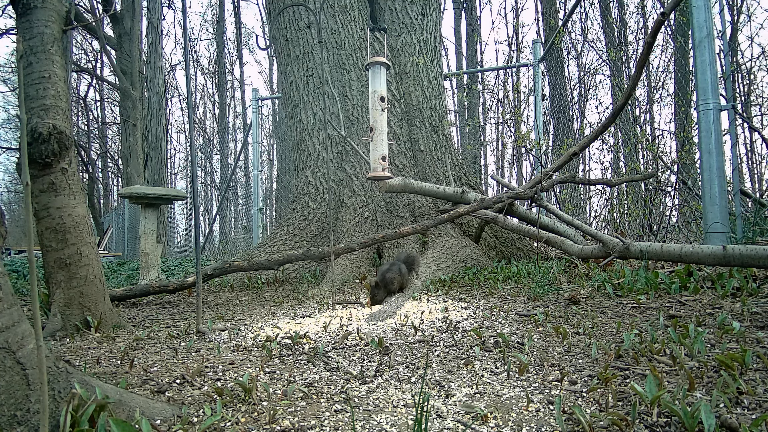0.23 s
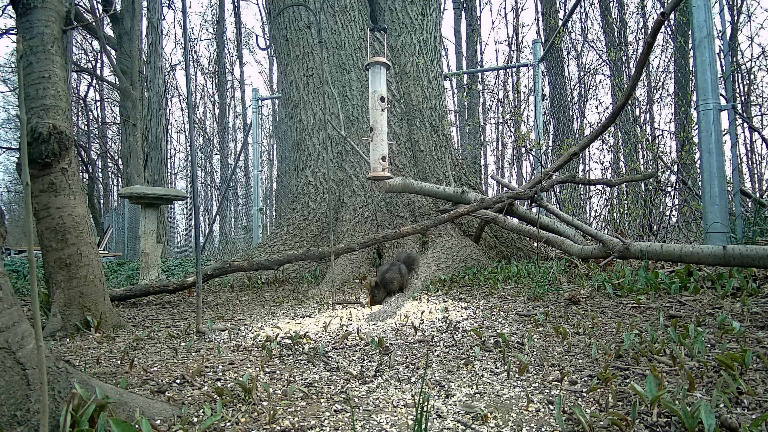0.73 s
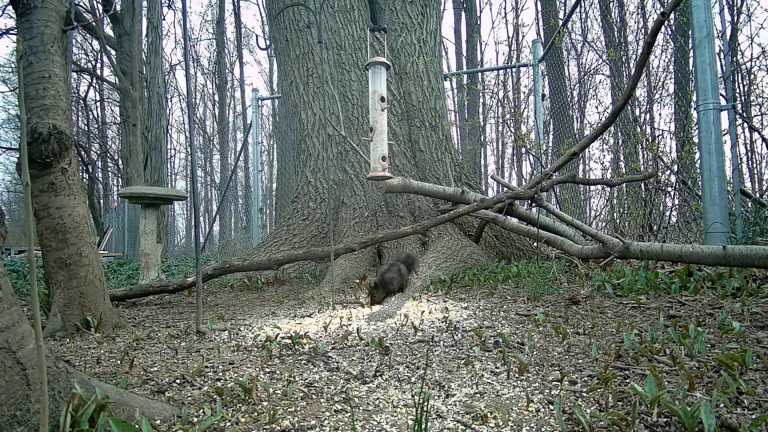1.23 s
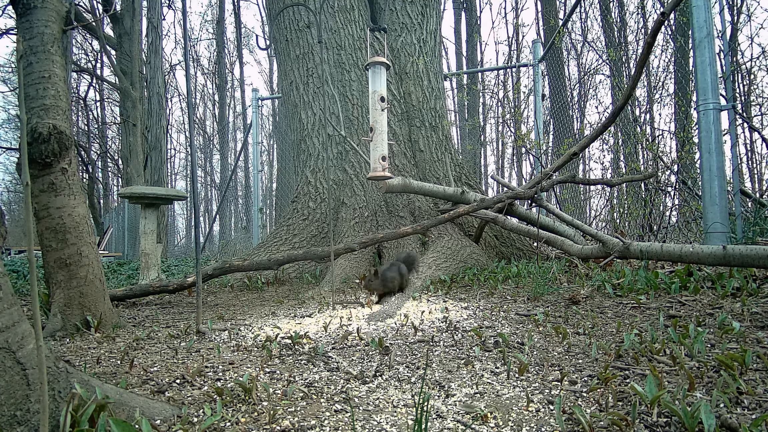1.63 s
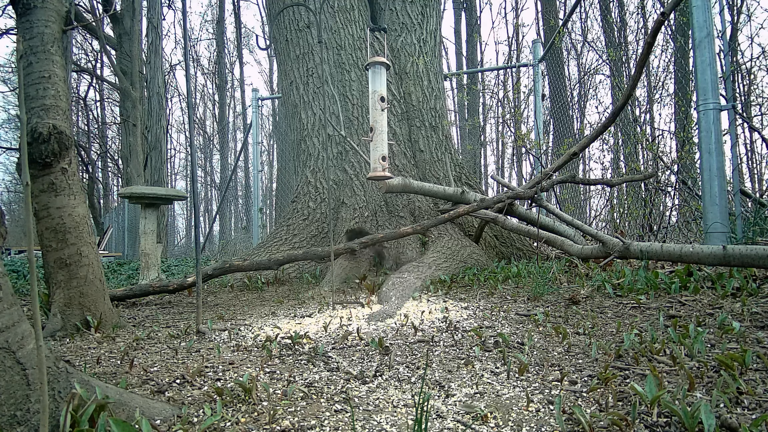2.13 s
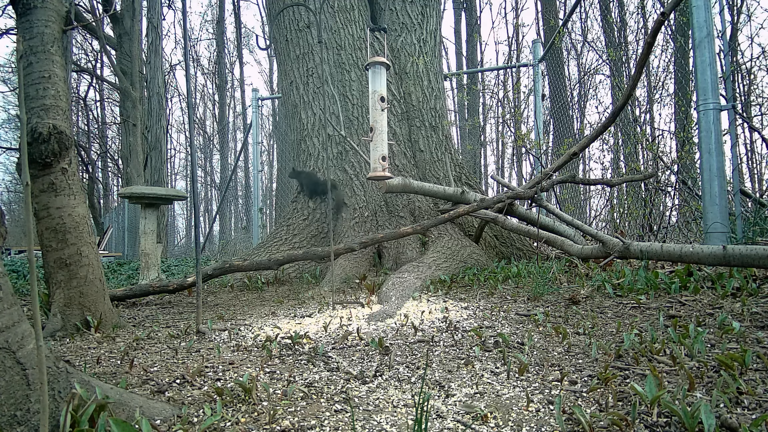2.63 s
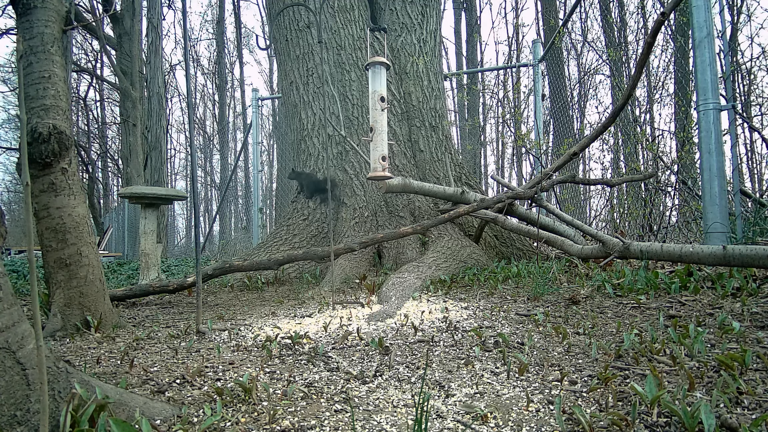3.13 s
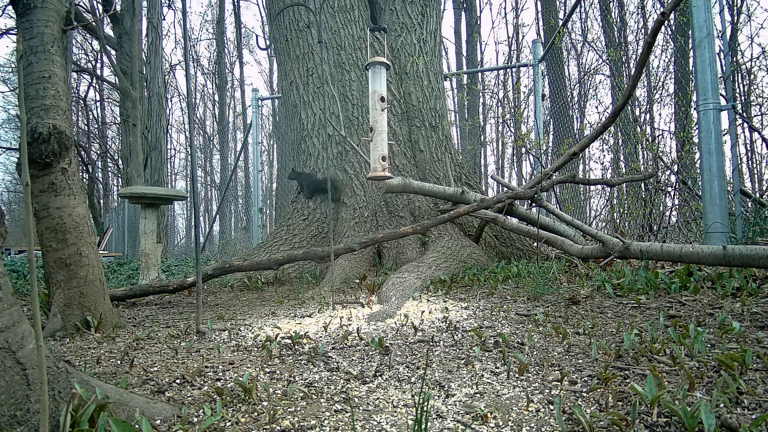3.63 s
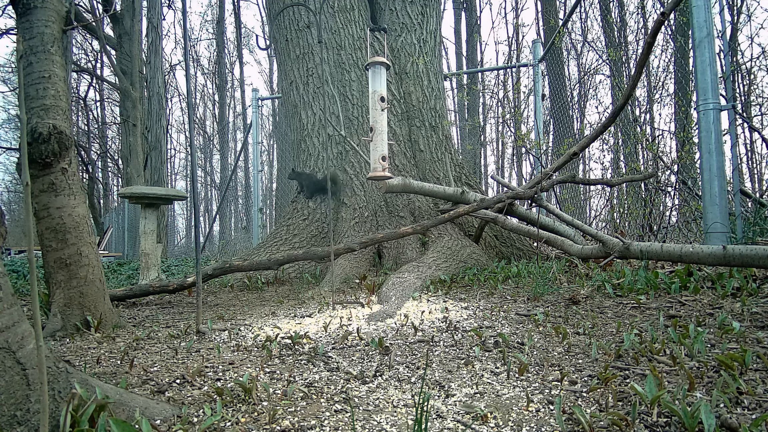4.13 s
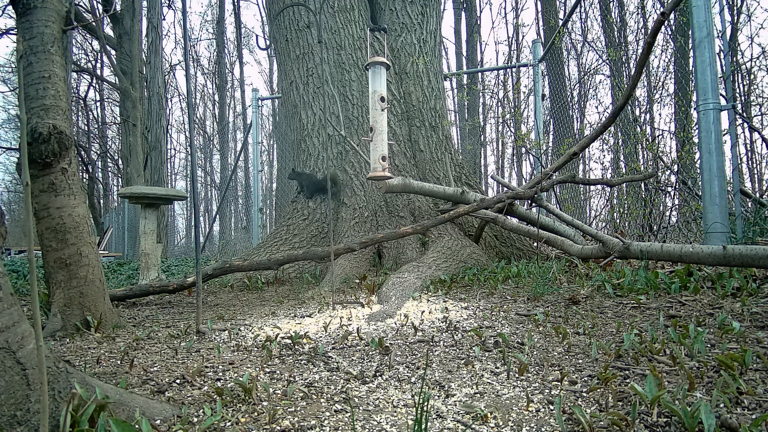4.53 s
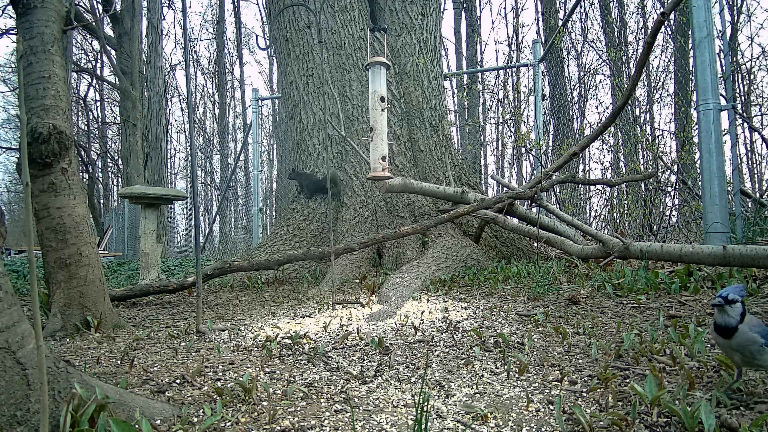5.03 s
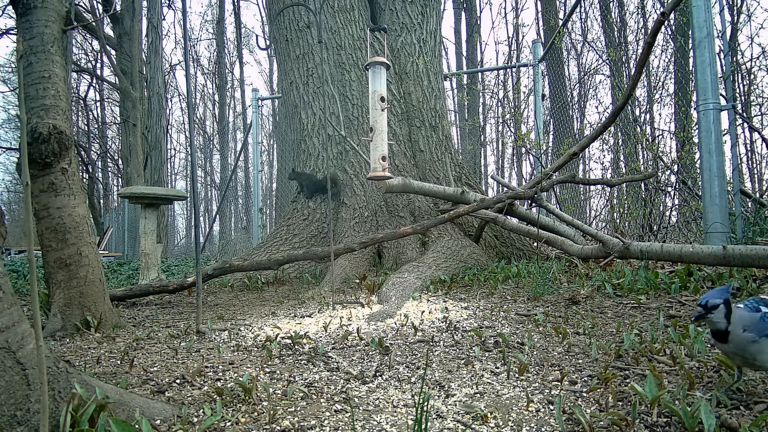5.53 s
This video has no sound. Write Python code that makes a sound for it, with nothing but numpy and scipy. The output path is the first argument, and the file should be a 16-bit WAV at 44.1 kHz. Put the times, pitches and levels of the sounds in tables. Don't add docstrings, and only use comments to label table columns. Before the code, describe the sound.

A woodland feeding spot heard through a cheap, bass-thin camera microphone. Throughout, a distant engine drones with loose, uneven low throbs, swelling around 2.3, 3.3 and 4.5 seconds, under a dull hush of traffic and leaves. A very faint, thin songbird whistle leaps up and falls at about 0.7 s. At 1.5 s a nearby jay gives a hoarse, falling scream of about 0.3 s, followed at 2.0 s by a louder, rough one. A shorter, clearer, sharp-fronted scream comes at 3.0 s. At 4.1 s there is a longer, purer one, buzzy at first and roughening as it drops. The loudest calls clip with gritty metallic overtones, and short echoes return from the trunks. Tiny claw crackles on bark or leaves tick around 5.0 s, a small rising chirp sounds at 5.5 s, and a sharper scratch at 5.74 s coincides with a fifth scream, cut off by the ending at about 5.8 s.

```python
import sys
import numpy as np
from scipy import signal
from scipy.fft import rfft, irfft, next_fast_len
from scipy.io import wavfile
from scipy.ndimage import uniform_filter1d, map_coordinates

SR = 44100
rng = np.random.default_rng(int(sys.argv[2]) if len(sys.argv) > 2 else 0)


def wrap_up_sound(samples):
    columns = np.atleast_2d(samples).T
    tamed = np.clip(columns, -1, 1)
    steps = np.round(tamed * 32767).astype(np.int16)
    wavfile.write(sys.argv[1], SR, steps)


def level_to_linear(level):
    exponent = np.asarray(level, float) / 20
    return 10 ** exponent


N = 254898


def unit(x):
    return x / np.sqrt(np.mean(x ** 2) + 1e-20)


def ramp(x):
    return np.clip(x, 0, 1)


def along(points, hz):
    f, v = np.transpose(points)
    return np.interp(np.log(hz + 1), np.log(f + 1), v)


def over_time(points):
    return np.interp(np.arange(N) / SR, *np.transpose(points))


def wobble(rate, size=N):
    knots = rng.standard_normal(int(size * rate / SR) + 4)
    return map_coordinates(knots, [np.arange(size) * rate / SR])


def filtered(x, response):
    m = next_fast_len(len(x) + 8192)
    return irfft(rfft(x, m) * response(np.fft.rfftfreq(m, 1 / SR)), m)[:len(x)]


def rush(spectrum, patchy_db):
    z = signal.stft(rng.standard_normal(N), nperseg=512)[2]
    field = uniform_filter1d(rng.standard_normal(z.shape), size=6, axis=0)
    field = unit(uniform_filter1d(field, size=14, axis=1))
    noise = signal.istft(z * level_to_linear(patchy_db * field), nperseg=512)[1][:N]
    return unit(filtered(noise, lambda hz: level_to_linear(along(spectrum, hz))))


# frequency in Hz, 60 dB decay time in seconds.
WOOD_DECAY = [(1000, .3), (2700, .33), (3350, 0.63), (4000, 0.37), (6400, 0.39), (8000, .27)]


def echoes(x, wet_db):
    hz, t, z = signal.stft(rng.standard_normal(SR), SR, nperseg=256)
    fade_db = -60 * t / along(WOOD_DECAY, hz)[:, None]
    far = 1.3 * level_to_linear(fade_db) * ramp(t / 0.045)
    near = 1.3 * level_to_linear(1.4 * fade_db)
    tail = signal.istft(z * (far + near), SR, nperseg=256)[1]
    tail *= ramp(np.arange(len(tail)) / SR / 0.015)
    tail /= np.linalg.norm(tail)
    return x + level_to_linear(wet_db) * signal.fftconvolve(x, tail)[:len(x)]


# centre in seconds, peak in dB, pitch in Hz.
HEAVY_THROBS = [(0.113, -12, 94), (.205, -13.5, 102), (0.479, -16.5, 87), (1.001, -10.5, 98),
                (1.919, -9, 80.4), (2.036, -8.5, 89), (2.314, -5, 66), (2.378, -8, 80), (2.431, -7.5, 69),
                (2.509, -11.5, 67.7), (2.557, -8, 64), (2.636, -9.5, 70), (2.689, -11.5, 82),
                (2.763, -11, 87), (2.809, -9, 79), (2.865, -13, 91), (3.262, -10, 107), (3.392, -5.5, 93.2),
                (3.441, -8, 89.4), (3.488, -7, 96.1), (3.547, -9, 97.4), (4.001, -13, 91.7), (4.1, -9, 85),
                (4.46, -7.5, 72), (4.505, -18, 77.4), (4.845, -14, 55), (5.004, -14, 78),
                (5.291, -10.5, 78.6), (5.347, -9, 79), (5.523, -15.5, 88)]
# time in seconds, level in dB.
LOAD = [(0.0, -26.5), (0.89, -27), (1.13, -26.5), (1.63, -25.5), (2.3, -18.5), (2.49, -25.5), (2.85, -22),
        (3.03, -18.5), (3.27, -14.5), (3.44, -18), (3.8, -25), (4.41, -17.5), (4.65, -18.5), (5.38, -23.5),
        (5.78, -24)]
THROB_GAP_S, THROB_JITTER = .056, .3
THROB_OVER_LOAD_DB, THROB_SCATTER_DB, THROB_HZ, THROB_SPREAD = 4, 3, 88, 0.21
THROB_FOLLOWS = .5


def throbs():
    count = int(N / SR / THROB_GAP_S)
    chance = rng.standard_normal((count, 3))
    jitter = THROB_JITTER * np.clip(chance[:, 0], -1, 1)
    s = (np.arange(count) + .5 + jitter) * THROB_GAP_S
    load_db = np.interp(s, *np.transpose(LOAD))
    db = load_db.mean() + THROB_FOLLOWS * (load_db - load_db.mean())
    db = db + THROB_OVER_LOAD_DB + THROB_SCATTER_DB * chance[:, 1]
    hz = THROB_HZ * np.exp(THROB_SPREAD * chance[:, 2])
    heavy_s = np.array(HEAVY_THROBS)[:, 0]
    free = np.abs(s[:, None] - heavy_s).min(axis=1) > THROB_GAP_S * .7
    return [*HEAVY_THROBS, *np.transpose([s, db, hz])[free]]


# frequency in Hz, level in dB per Hz.
DRONE_SPECTRUM = [(12, -57), (20, -26), (39, -5.5), (86, -1.5), (106, -0.5), (124, -10), (161, -5.5),
                  (247, -27.5), (274, -31.5), (300, -35.5), (390, -58), (660, -120)]


def engine():
    out, t = np.zeros(N + SR), np.arange(-SR // 16, SR // 16) / SR
    swell = np.exp(-.5 * (t / 0.011) ** 2)
    for (s, db, hz), turn in zip(throbs(), rng.random(200)):
        out[round(s * SR):][:len(t)] += level_to_linear(db - 0.3) * swell * np.sin(2 * np.pi * (hz * t + turn))
    drone = rush(DRONE_SPECTRUM, patchy_db=.3)
    power = np.abs(uniform_filter1d(drone ** 2, size=2600))
    drone = unit(drone / (power + .05) ** .35)
    return out[SR // 16:][:N] + level_to_linear(over_time(LOAD) - 2.0) * drone


# frequency in Hz, level in dB per Hz.
WASH_SPECTRUM = [(120, -19), (200, -6.5), (234, -10), (300, -14.5), (330, -15), (536, -18.5), (830, -17),
                 (1370, -21.5), (1500, -22), (1680, -22), (4220, -41.5), (6750, -53), (8400, -71.5),
                 (10900, -100), (18500, -120)]
# time in seconds, level in dB.
WASH_SWELL = [(0, -37.5), (1.4, -38), (2.8, -36.5), (3.9, -36.5), (4.9, -36), (5.4, -36.5), (5.78, -34.5)]


def traffic_wash():
    level = level_to_linear(over_time(WASH_SWELL) + 0.56 * wobble(4.3))
    return level * rush(WASH_SPECTRUM, patchy_db=1.4)


# time in seconds, pitch in Hz, level in dB.
WHISTLES = [
    [(.705, 3030, -66), (.73, 3280, -54), (.75, 3380, -51), (.765, 4130, -50), (.785, 4050, -50),
     (.8, 3840, -52), (.808, 3350, -50), (.83, 3050, -50), (.845, 3050, -65)],
    [(5.45, 3355, -59), (5.48, 3405, -42), (5.5, 3783, -48), (5.525, 3660, -50), (5.545, 3730, -66)],
]


def songbird():
    out, t = np.zeros(N), np.arange(N) / SR
    for rows in WHISTLES:
        s, hz, db = np.transpose(rows)
        level = level_to_linear(np.interp(t, s, db, left=-150, right=-150) - 3.5 + 4.8 * wobble(110))
        pitch = np.interp(t, s, hz) * (1 + .018 * wobble(200))
        out += level * np.sin(2 * np.pi * np.cumsum(pitch) / SR)
    return echoes(out, wet_db=-6)


# frequency in Hz, width in Hz, level in dB.
THROAT = [(1660, 240, -21.5), (3100, 1400, 8), (4630, 1300, -12.5), (5970, 2200, -2.5), (8530, 3600, -21)]


def throat(hz):
    return sum(level_to_linear(db) * 1j * hz * w / (c * c - hz * hz + 1j * hz * w) for c, w, db in THROAT)


# partial number, group (0 main, 1 eighth, 2 low, 3 upper, 4 half-way,
# 5 chest), tilt inside the group in dB.
PARTIALS = [(1, 5, .1), (2, 2, -2.5), (3, 2, 2.5), (4, 0, .1), (5, 3, .1), (6, 3, .6), (7, 3, -2.5),
            (8, 1, .1), (9, 3, -12), (2.5, 4, -5), (3.5, 4, -3), (4.5, 4, 2.5), (5.5, 4, -3), (6.5, 4, -3),
            (7.5, 4, .6)]
# from, partly thinned, thinnest, back, all in seconds.
PURE_S = (4.2, 4.27, 4.338, 4.35)
THIN_DB, BREAK_DB = -17, 3
SHUT_EIGHTH_DB, SHUT_LOW_DB = -19.5, -8.5
CLOSING_S, CLOSE_EIGHTH_DB, CLOSE_LOW_DB, CLOSE_UPPER_DB = 0.029, -11.5, -10, -8
TIRING_S, TIRED_LOW_DB = .16, -8
DOUBLED_DB = -3


def scream(rows, colour, chest, start, end, snap, sag, doubled):
    t = start + np.arange(int(1.2 * SR)) / SR
    size = len(t)
    age, left = t - start, end - t
    s, *cols = np.transpose(rows)
    top_hz, main_db, hoarse = [np.interp(t, s, c) for c in cols]
    hoarse, top_hz = ramp(hoarse), uniform_filter1d(top_hz, size=400)

    eighth_db, low_db, upper_db, opening_s = colour
    shut, closing = np.exp(-age / opening_s), ramp(1 - left / CLOSING_S)
    back_db = BREAK_DB * (start < PURE_S[0] < end)
    thin_db = np.interp(t, PURE_S, [0, .6 * THIN_DB, THIN_DB, back_db])
    eighth_db = eighth_db + SHUT_EIGHTH_DB * shut + CLOSE_EIGHTH_DB * closing
    low_db = low_db + SHUT_LOW_DB * shut + CLOSE_LOW_DB * closing + thin_db
    low_db = low_db + TIRED_LOW_DB * ramp(1 - left / TIRING_S) - 14 * ramp(1 - age / 0.01)
    upper_db = upper_db + CLOSE_UPPER_DB * closing + thin_db
    halfway_db = upper_db + DOUBLED_DB - 40 * ramp((t - doubled) / .03 + 1)
    share, middle_s, half_s = chest
    chest_share = share * np.exp(-((t - middle_s) / half_s) ** 4) + 0.0057
    chest_db = main_db + 20 * np.log10(np.clip(chest_share, .003, 1))
    group_db = [main_db, eighth_db, low_db, upper_db, halfway_db, chest_db]

    scoop = 1 - snap / (1 + np.exp(np.clip((age - .005) / .0014, -30, 30)))
    waver = 1 + (.001 + .03 * hoarse ** 2) * wobble(90, size)
    turns = np.cumsum(top_hz * scoop * waver / 4) / SR
    turns = turns + hoarse * 0.038 * wobble(330, size)
    droop_share = sag * ramp(1 - (left - .006) / (.22 * sag)) ** 2.5
    droop = np.cumsum(top_hz * droop_share) / SR

    voice = np.zeros(size)
    for k, group, tilt_db in PARTIALS:
        main = k == 4
        flutter_db = (0.31 + 7 * hoarse * (1 - 0.27 * main)) * wobble(75, size)
        flutter_db = flutter_db + 1.6 * (not main) * wobble(30, size)
        flutter_db = flutter_db + 2.4 * (k == 1) * wobble(120, size)
        level = level_to_linear(group_db[int(group)] + tilt_db + 1.0 + flutter_db)
        voice += level * np.sin(2 * np.pi * (k * turns - main * droop + rng.random()))
    breath = filtered(rng.standard_normal(size), throat)
    breath = unit(filtered(breath, lambda hz: hz > 1300))
    effort = np.sqrt(sum(level_to_linear(db) ** 2 for db in group_db))
    voice += effort * hoarse ** 2 * 1.38 * breath * level_to_linear(2.8 * wobble(110, size))
    gate = ramp(age / .0035) * ramp(left / .011)
    return echoes(voice * gate, wet_db=-20.5)


# time in seconds, fourth partial in Hz, its level in dB, hoarseness 0-1.
CONTOURS = [
    [(1.542, 3457, -15.5, .35), (1.575, 3573, -8.5, .33), (1.63, 3476, -9.5, .3), (1.69, 3400, -6.5, .25),
     (1.75, 3255, -8, .4), (1.79, 3175, -7.5, 0.6), (1.812, 3005, -7, .55)],
    [(2.012, 3430, -4.5, 0.5), (2.05, 3492, -4.5, .5), (2.1, 3487, -7, 0.4), (2.14, 3308, -5.5, .4),
     (2.19, 3288, -1.2, 0.5), (2.24, 3146, -2.5, .46), (2.293, 2969, -5, .55)],
    [(3.046, 3517, -1.3, .36), (3.075, 3545, 6.5, 0.1), (3.092, 3507, -0.6, .25), (3.112, 3372, 5, .14),
     (3.145, 3353, -4, .18), (3.2, 3206, -7, .35), (3.252, 3182, -8.5, 0.6)],
    [(4.114, 3426, 2, .25), (4.16, 3467, 2, .2), (4.25, 3376, 1.1, 0), (4.3, 3280, 4.5, .16),
     (4.335, 3242, -0.5, .2), (4.35, 3120, -6, .42), (4.412, 2933, -2.5, 0.5)],
    [(5.756, 3340, -5.5, .6), (5.772, 3463, 1, 0.1)],
]
# beak opens in seconds, closes in seconds, upward snap share, final sag share,
# period doubling until seconds.
LIMITS = [
    (1.5285, 1.826, .27, .14, 1.645),
    (1.9965, 2.301, .15, .095, 0),
    (3.034, 3.261, .15, .1, 0),
    (4.1022, 4.422, .22, .09, 4.28),
    (5.7408, 5.9, .22, .1, 0),
]
# eighth partial in dB, low partials in dB, upper partials in dB, opening time in seconds.
COLOURS = [
    (-6.5, -16, -23, 0.12),
    (-14, -14.5, -25, 0.029),
    (-10, -15.5, -15.5, 0.025),
    (-7.5, -16.5, -19.5, .03),
    (-7.5, -4.5, -14, .008),
]
# share 0-1, middle in seconds, half length in seconds.
CHEST = [
    (.06, 1.7, .06),
    (.05, 2.1, .08),
    (.12, 3.125, .05),
    (.14, 4.195, .08),
    (.2, 5.775, .02),
]


def jay():
    out = np.zeros(N + 2 * SR)
    for rows, colour, chest, limits in zip(CONTOURS, COLOURS, CHEST, LIMITS):
        call = scream(rows, colour, chest, *limits)
        out[round(limits[0] * SR):][:len(call)] += call
    return out[:N]


# centre in seconds, peak in dB, pitch in Hz, length in seconds.
SCRATCHES = [(2.602, -57, 5290, .004), (4.862, -67, 6800, .03), (4.963, -60, 5930, 0.0058),
             (5.009, -57, 7260, 0.0031), (5.021, -39.5, 6500, 0.0044), (5.037, -52, 5360, .006),
             (5.066, -63, 7370, .012), (5.138, -60.5, 7300, 0.0019), (5.158, -65, 7050, 0.0038),
             (5.308, -57.5, 6370, 0.0014), (5.692, -52, 7600, 0.0095), (5.707, -53, 6470, .006),
             (5.74, -32, 7000, 0.0025)]


def claws():
    out, t = np.zeros(N + SR), np.arange(-2048, 2048) / SR
    for s, db, hz, length_s in SCRATCHES:
        grit = rng.standard_normal(len(t)) * level_to_linear(5.1 * wobble(736, len(t)))
        grit = unit(filtered(grit, lambda f: np.exp(-.5 * ((f - hz) / 1500) ** 2)))
        puff = np.exp(-.5 * (t / length_s) ** 2)
        out[round(s * SR) - 2048:][:len(t)] += level_to_linear(db + 1.0) * grit * puff
    return out[:N]


def low_cut(hz):
    u = 1j * hz / 85
    return u * u / (1 + np.sqrt(2) * u + u * u)


def scene():
    deep = filtered(engine(), lambda hz: 1 / (np.abs(low_cut(hz)) + 0.1))
    return (deep + traffic_wash() + songbird() + jay() + claws())[None]


def top_cut(x):
    return signal.sosfilt(signal.butter(12, 15930, fs=SR, output="sos"), x)


def record(dry):
    up, down = 160, 441
    smooth = signal.firwin(40 * down + 1, 1.03 / down, window=("kaiser", 8))
    faded = dry[0] * ramp(np.arange(N) / 300)
    coarse = np.clip(signal.resample_poly(faded, up, down, window=smooth), -.75, .75)
    fine = np.pad(signal.resample_poly(coarse, down, up, window=smooth), (0, 8))[:N]
    fine = filtered(fine, low_cut)
    mix = np.clip(fine, -.745, .745)[None] + .002
    return top_cut(mix)


dry = scene()
out = record(dry)
wrap_up_sound(out)
```